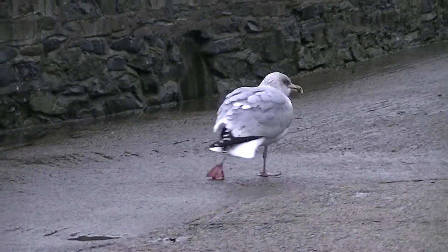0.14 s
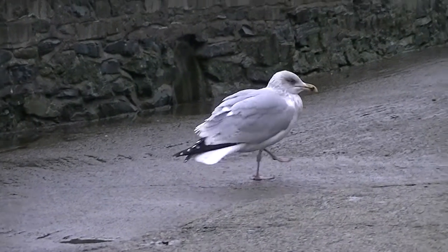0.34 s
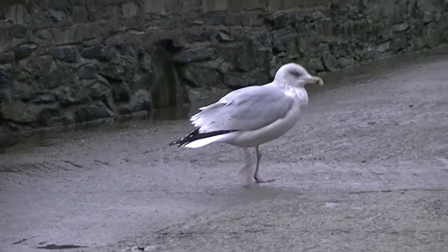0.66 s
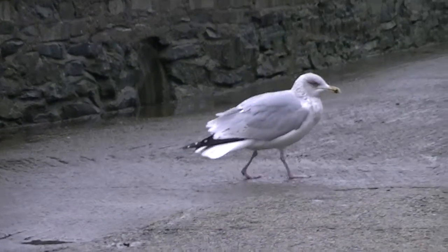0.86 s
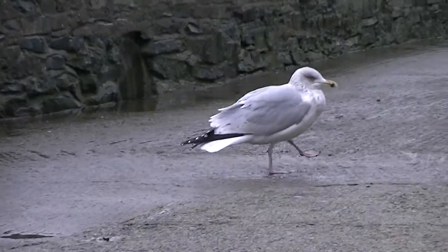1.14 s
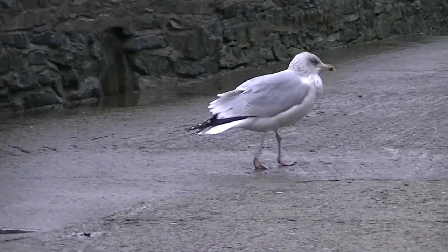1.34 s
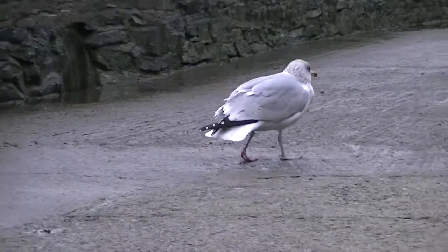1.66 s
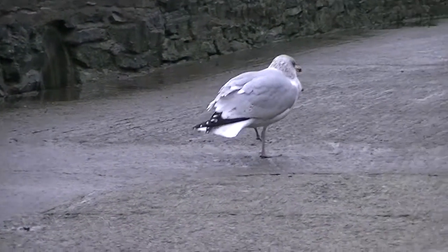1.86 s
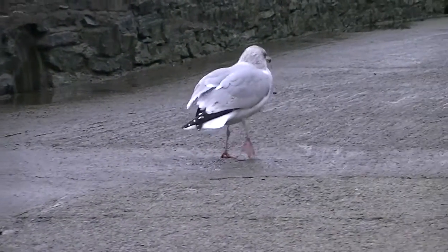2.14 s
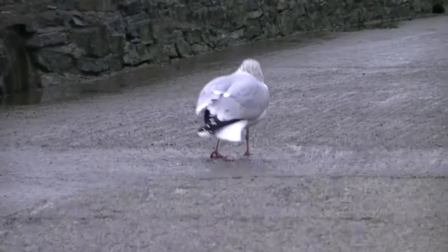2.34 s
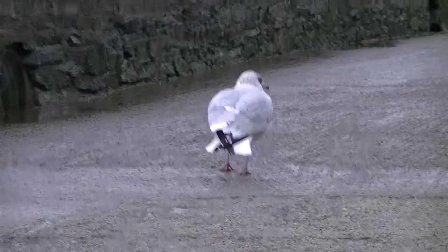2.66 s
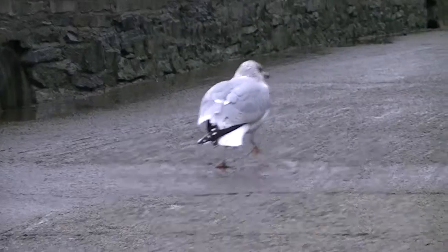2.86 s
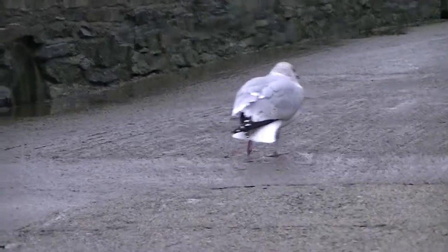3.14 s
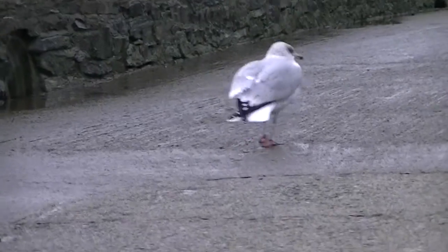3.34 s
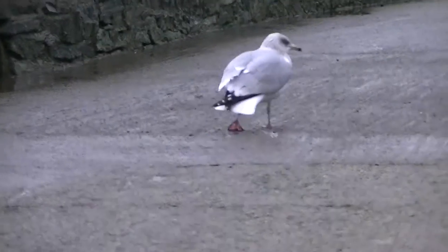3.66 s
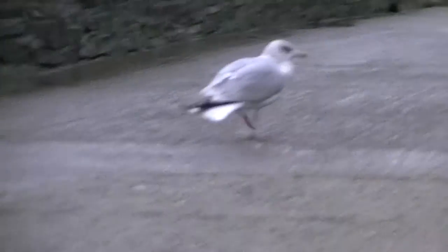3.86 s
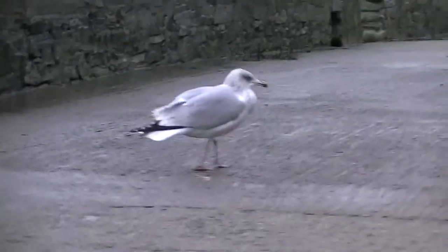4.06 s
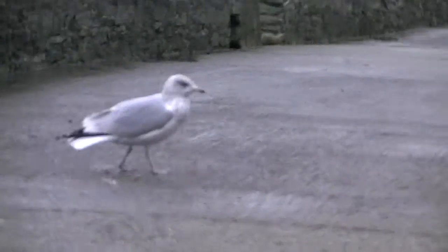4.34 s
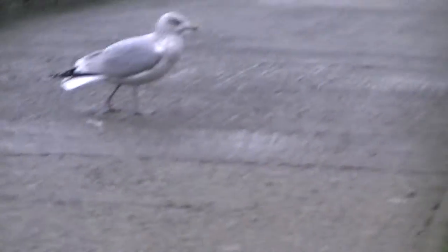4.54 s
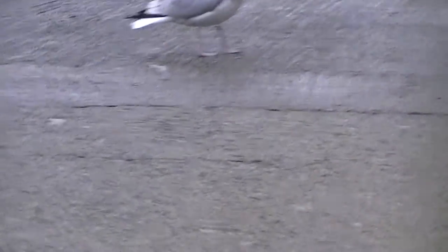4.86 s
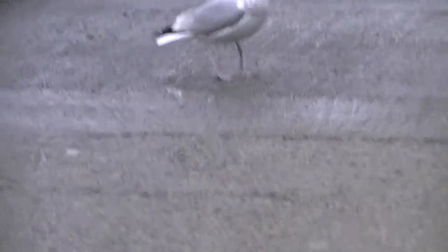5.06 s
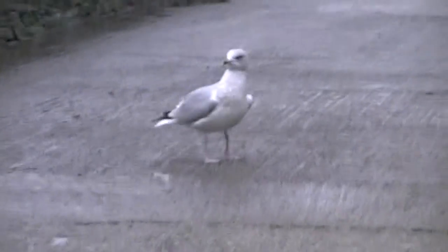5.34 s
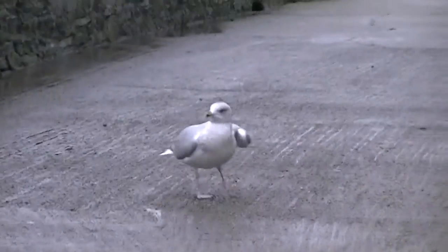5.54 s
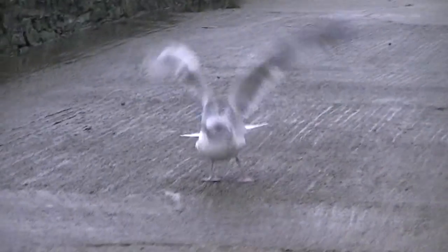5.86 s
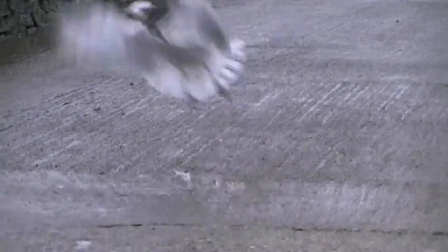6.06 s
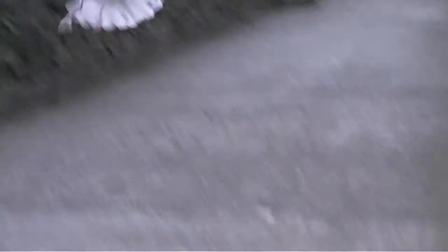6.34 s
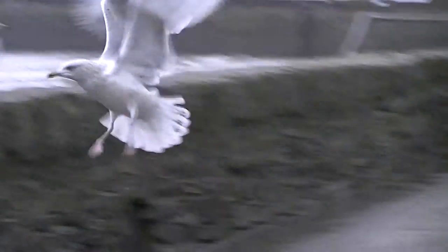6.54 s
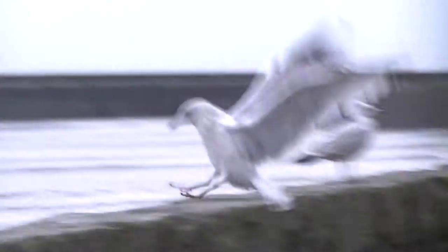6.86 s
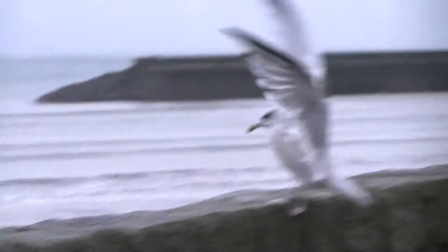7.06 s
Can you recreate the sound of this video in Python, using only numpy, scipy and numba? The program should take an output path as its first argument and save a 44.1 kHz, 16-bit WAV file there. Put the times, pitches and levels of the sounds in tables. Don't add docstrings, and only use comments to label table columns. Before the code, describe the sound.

A seaside slipway with continuous surf, a mid-heavy rushing hiss, slightly wide, with thin bass. From about 0.1 to 1.05 s a gull gives a long, rough, buzzing cry, moderate in level, its pitch rising and then falling; a crisp foot tick falls at 0.75. Surf alone follows until a short, much louder, sinking squawk at 2.45-2.95. Foam hiss grows from 3 s, with a barely audible peep at 3.55 and light ticks at 3.25 and 4.2. From 5.3 a breaker swells sharply into a throbbing roar with spattering spray, strongest near 5.8. A third hoarse cry, in two parts, sounds at 5.5-6.0, fading into it. Soft, dull wing beats puff between 6.05 and 6.65. A distant small bird peeps upward at 6.77 and faintly downward at 7.0, with a sharp tick at 6.97, as the wave eases but stays strong. Cries have a short stony slap.

```python
import sys
import numpy as np
from scipy import signal
from scipy.fft import rfft, irfft
from scipy.io import wavfile
from scipy.ndimage import uniform_filter1d
from numba import njit

SR = 44100
rng = np.random.default_rng(int(sys.argv[2]) if len(sys.argv) > 2 else 0)


def volts_from_decibels(level):
    exponent = np.asarray(level, float) / 20
    return 10 ** exponent


def dump_mix(stems):
    frames = np.atleast_2d(stems).T
    limited = np.clip(frames, -1, 1)
    pcm = np.round(limited * 32767).astype(np.int16)
    wavfile.write(sys.argv[1], SR, pcm)


N = 317520


@njit
def svf(x, hz, width):
    y, band, low = np.empty(len(x)), 0., 0.
    for i in range(len(x)):
        g, k = np.tan(np.pi * hz[i] / SR), width / hz[i]
        v = (band + g * (x[i] - low)) / (1 + g * (g + k))
        band = 2 * v - band
        low = low + 2 * g * v
        y[i] = k * v
    return y


def resonance(x, hz, width_hz):
    centre_hz = np.clip(hz, 20, .45 * SR) + np.zeros(len(x))
    each_hz = 1.9 * width_hz
    y = svf(svf(x, centre_hz, each_hz), centre_hz, each_hz)
    return y / np.std(y)


def sharp_resonance(x, hz, width_hz):
    return resonance(resonance(x, hz, width_hz), hz, width_hz)


def butter(x, order, hz, kind="low"):
    return signal.sosfilt(signal.butter(order, hz, kind, fs=SR, output="sos"), x)


def walk(rate_hz, size=N):
    k = max(int(SR / rate_hz), 1)
    held = np.repeat(rng.standard_normal(size // k + 1), k)
    return 1.41 * uniform_filter1d(uniform_filter1d(held, k), k)[:size]


def columns(table, t):
    s, *cols = np.transpose(table)
    return [np.interp(t, s, c) for c in cols]


def on_log(table, hz):
    f, v = np.transpose(table)
    return np.interp(np.log(hz), np.log(f), v)


def add(out, x, t, pan_db):
    i = int(t * SR)
    sides = volts_from_decibels(np.multiply.outer([.5, -.5], pan_db + np.zeros(len(x))))
    x = (x * sides)[:, :N - i]
    out[:, i:i + x.shape[1]] += x


def coloured(extra=((20, 0), (20000, 0))):
    # (frequency [Hz], level per Hz [dB])
    surf_colour = [(30, -37.5), (150, -26.5), (290, -9.5), (500, -3.5), (610, -1.5), (880, -4),
                   (1410, -2.5), (1900, -4.5), (3260, -13.5), (4500, -19.5), (6000, -25.5), (8000, -36.5),
                   (11000, -48.5), (20000, -72)]
    hz = np.arange(N // 2 + 1) * SR / N + 1
    level_db = on_log(surf_colour, hz) + on_log(extra, hz)
    return irfft(rfft(rng.standard_normal(N)) * volts_from_decibels(level_db), N)


def drops(roar_db):
    drops_per_s, drop_db, spread_db, drop_hz = 40, -19.5, 2.5, 5800
    chance = rng.random((int(drops_per_s * N / SR), 3))
    at = (chance[:, 0] * N).astype(int)
    size = volts_from_decibels(roar_db[at] + drop_db - spread_db * np.log(chance[:, 1]))
    out = np.zeros((2, N))
    out[:, at] = size * [chance[:, 2], 1 - chance[:, 2]]
    return 20 * butter(out, 2, [.8 * drop_hz, 1.25 * drop_hz], "band")


def surf():
    # (time [s], breaker [dB], foam [dB])
    swell = [(0, 1.5, 0), (1.1, 0, 4.5), (1.5, 0, -1), (2.3, 1.5, -1), (3.0, -0.5, 6.5), (3.6, 0.5, 9),
             (4.3, 0, 7), (4.8, 3.5, 9.5), (5.05, 5, 12), (5.3, 7.5, 13), (5.5, 15.5, 10),
             (5.8, 17.5, 20.5), (6.05, 16, 12), (6.5, 14.5, 14.5), (6.8, 14, 13.5), (7.05, 10.5, 15),
             (7.2, 10.5, 15)]
    # (calm level [dB], per breaker [dB/dB], per foam [dB/dB])
    layers = [(-42, 0.575, -0.07), (-35, 0.3378, 0.2428), (-51, -0.2981, 1.143), (-43, 1.0265, -0.11)]
    # (frequency [Hz], side minus mid [dB])
    width_spectrum = [(60, -12), (110, -37), (190, -21), (340, -27), (600, -23), (1060, -16), (1880, -17),
                      (3330, -15.5), (5910, -13.5), (10500, -10)]
    breaker_db, foam_db = columns(swell, np.arange(N) / SR)
    wash_db, hiss_db, spray_db, roar_db = (db + a * breaker_db + b * foam_db for db, a, b in layers)
    mid, side = coloured(), coloured(width_spectrum)
    pair = np.array([mid + side, mid - side])
    low = butter(pair, 2, 900)
    top = butter(pair, 2, 3200, "high")
    body = pair - low - top
    parts = ((low, wash_db), (body, hiss_db), (top, spray_db))
    sea = sum(x / np.std(x) * volts_from_decibels(db + 0.69 * walk(9)) for x, db in parts)
    roar_hz, drift = 908, 0.078
    roar = resonance(rng.standard_normal(N), roar_hz * (1 + drift * walk(3.13)), 164.0)
    roar = roar * volts_from_decibels(roar_db + 0.5 * walk(30))
    upper = resonance(rng.standard_normal(N), 1.634 * roar_hz, 150.0)
    upper = upper * volts_from_decibels(roar_db - 9.5 + 1.5 * walk(14))
    return sea + roar + upper + drops(roar_db)


def far_peeps():
    # (time [s], length [s], start pitch [Hz], end pitch [Hz], level [dB])
    peeps = [
        (3.54, .03, 3000, 3020, -40.5),
        (6.765, .055, 2260, 2380, -27),
        (6.985, .115, 2380, 1650, -36.5),
    ]
    out = np.zeros((2, N))
    for s, length_s, from_hz, to_hz, db in peeps:
        u = np.arange(0, 1, 1 / (length_s * SR))
        pitch_hz = from_hz + (to_hz - from_hz) * u + 40 * walk(100, size=len(u))
        tone = np.sin(2 * np.pi * np.cumsum(pitch_hz) / SR)
        level = volts_from_decibels(db + 3.0 + 2.1 * walk(90, size=len(u)))
        add(out, level * tone * np.sqrt(np.sin(np.pi * u)), s, 0)
    return out


def ticks_and_flaps():
    # (time [s], peak level [dB], centre [Hz], T60 [s])
    ticks = [
        (0.7454, -18, 4100, 0.006),
        (3.241, -33, 5130, 0.0076),
        (4.22, -28, 4150, 0.0074),
        (6.6837, -31, 4280, 0.0066),
        (6.946, -42, 5540, 0.006),
        (6.9685, -16, 4800, 0.0036),
        (7.0294, -34, 4310, 0.006),
        (7.1044, -26, 4160, 0.006),
    ]
    # (time [s], peak level [dB], centre [Hz], T60 [s])
    flaps = [
        (6.064, -12.5, 834, 0.015),
        (6.229, -17, 780, 0.035),
        (6.316, -12, 920, 0.031),
        (6.489, -14, 950, 0.032),
        (6.614, -15, 1060, 0.013),
        (6.649, -27, 767, 0.025),
    ]
    out = np.zeros((2, N))
    t = np.arange(2048) / SR
    for events, width in ((ticks, .55), (flaps, .4)):
        for s, db, hz, t60_s in events:
            push = (rng.standard_normal(len(t)) + 14 * (t == 0)) * np.exp(-np.log(1000) * t / t60_s)
            puff = sharp_resonance(push, hz, width * hz)
            add(out, volts_from_decibels(db) * puff / np.max(np.abs(puff)), s, 0)
    return out


def reed(hz, jitter):
    turns = np.cumsum(hz * (1 + jitter * walk(150, size=len(hz))) / SR)
    k = np.arange(1, 29)[:, None]
    spread = 2 * np.pi * rng.random((len(k), 1))
    harmonics = np.cos(2 * np.pi * k * turns + spread) * (k * hz < 10800)
    return np.sum(harmonics, axis=0) / np.sqrt(7500 / hz)


def steady(x):
    k = int(.035 * SR)
    return x / np.sqrt(uniform_filter1d(uniform_filter1d(x ** 2, k), k))


def cry(row, temper, effort, syrinx, clear_db, jitter, droop):
    # (centre at rest [Hz], width [Hz], level [dB], per gape [dB], share of throat motion)
    throat = [(2028, 254, -0.5, 6.5, 1), (2720, 310, -14, 7, 0.18), (3480, 350, -12, -1, 0.17)]
    beak = [(4300, 280, -11, 0, .1), (5000, 240, -9, 0, .4), (5600, 300, -12, 0, .2),
            (7050, 420, -12, 0, .4)]
    # (centre [share of focus], width [Hz], level [dB], throat drop [dB/octave])
    passes = [(.65, 457, -18.5, 59.5), (0.802, 505, -4, -17.5), (1.06, 860, -0.5, -1), (1.5, 1030, -11, -9),
              (2.0, 1520, -18, -16)]
    from_hz, to_hz, hold, bright_db, pan_db = row
    deep_db, choke, breath, focus_hz, chest_db = temper
    left_db, deep_start_db, deep_end_db = clear_db
    t = np.arange(effort[0][0], effort[-1][0], 1 / SR)
    n = len(t)
    effort_db, gape, throat_hz = columns(effort, t)
    high_hz, deep_hz, gullet_hz = columns(syrinx, t)
    focus_hz = focus_hz * (high_hz / high_hz.mean()) ** .5
    drop_octaves = droop * np.log2(throat_hz.max() / throat_hz)
    breath = breath * np.clip(1 - .4 * gape, 0, 2)

    def shimmer(level_db, rate_hz, spread_db=1.6):
        return volts_from_decibels(level_db + spread_db * walk(rate_hz, size=n))

    rasp_hz = from_hz + (to_hz - from_hz) * np.clip((np.arange(n) / n - hold) / (1 - hold), 0, 1)
    rasp = np.cumsum(rasp_hz * (1 + .018 * walk(80, size=n)) / SR) % 1
    gate = 1 - np.clip(choke, 0, 1) * np.exp(-(np.minimum(rasp, 1 - rasp) / .18) ** 2)
    turn = .5 + .5 * np.tanh(4.5 * np.sin(2 * np.pi * rasp))
    bend = 1 + 0.018 * (rasp - .5)
    high = turn * reed(high_hz * bend, jitter)
    deep = (1 - turn) * reed(deep_hz * bend, jitter)
    clean = steady(gate * (high + volts_from_decibels(np.linspace(deep_start_db, deep_end_db, n)) * deep))
    source = gate * (high + volts_from_decibels(deep_db) * deep + .75 * breath * rng.standard_normal(n))

    beak_db = effort_db + bright_db + 0.27 * (effort_db - effort_db.max())
    voice = volts_from_decibels(effort_db + chest_db) * steady(resonance(source, 1110, 230))
    gullet = steady(resonance(source, gullet_hz, 220))
    voice = voice - shimmer(effort_db - 0.85 - 6 * gape, 22.8) * gullet
    for share, width_hz, db, per_drop in passes:
        level = shimmer(beak_db + left_db + db + per_drop * drop_octaves, 9.1, spread_db=1.8)
        voice = voice + level * sharp_resonance(clean, share * focus_hz, width_hz)
    for k, (hz, width_hz, db, per_gape, share) in enumerate(throat + beak):
        centre_hz = hz * (throat_hz / 2000) ** share
        drive_db = effort_db
        if k >= len(throat):
            drive_db = beak_db - 4 * np.minimum(((centre_hz - focus_hz) / 900) ** 2, 2.2)
        level = shimmer(drive_db + db + per_gape * gape, 24.8)
        voice = voice + (-1) ** k * level * steady(resonance(source, centre_hz, width_hz))

    air = volts_from_decibels(beak_db - 20) * resonance(source, 2600.0, 1800.0)
    air = air + volts_from_decibels(beak_db - 32) * resonance(source, 12800.0, 2000.0)
    snap = resonance(gate * rng.standard_normal(n), 12500.0, 1300.0)
    air = air + volts_from_decibels(beak_db - 16.5) * np.exp(-(t - t[0]) / 0.039) * snap
    fade = np.clip(np.minimum(t - t[0], t[-1] - t) / 0.027, 0, 1)
    return (voice + air) * fade, pan_db


def gulls():
    # (rasp at start [Hz], rasp at end [Hz], rasp hold [0-1], beak over throat [dB], pan [dB])
    cries = [(91.3, 71, .12, -4, 2), (88.9, 57, .4, -0.5, 1.4), (92.2, 66, .1, -7, .6)]
    # (low side over high [dB], choke [0-1], breath share, beak focus [Hz], chest [dB])
    tempers = [(0, 0.7, 1.8, 4390, -6), (0, 0.67, 1.27, 4840, -21), (0, .6, 1.75, 4690, -15)]
    # (time [s], effort [dB], gape [0 = middling, negative = narrower], throat [Hz])
    efforts = [
        [(.1, -44, -.6, 1970), (.125, -33.5, -0.85, 2140), (.22, -33, -0.53, 2280), (.46, -34, -0.33, 1970),
         (.57, -33, 0.73, 1830), (.72, -34.5, 0.87, 1850), (.8, -40, -0.27, 1880), (.93, -39, -0.57, 2000),
         (1.06, -52, 0, 1950)],
        [(2.44, -46, 0.18, 2300), (2.462, -23.5, 0.89, 2100), (2.52, -20.5, -0.028, 2170),
         (2.62, -22.5, -0.25, 2200), (2.7, -22.5, .1, 2092), (2.82, -26, 0.52, 1870), (2.89, -34, -0.75, 1860),
         (2.92, -42.5, -2.2, 1880), (2.95, -56, -0.54, 1900)],
        [(5.475, -33, -.6, 1860), (5.505, -22.5, -.1, 1900), (5.59, -22, -0.35, 1980), (5.66, -22, 0.69, 1810),
         (5.72, -27, -0.7, 1890), (5.83, -30.5, 0.18, 1990), (5.92, -33, 0.16, 1850), (6.0, -42, -0.32, 1850)],
    ]
    # (time [s], high side pitch [Hz], low side pitch [Hz], gullet [Hz])
    pitches = [
        [(.1, 765, 599, 1560), (.25, 790, 627, 1530), (.5, 856, 619, 1450), (.58, 909, 614.6, 1580),
         (.7, 929, 615, 1570), (.8, 878, 569, 1493), (.95, 763, 528, 1500), (1.06, 762, 522, 1400)],
        [(2.43, 756, 517, 1420), (2.5, 767, 523, 1530), (2.56, 732, 522, 1610), (2.74, 678, 526.5, 1490),
         (2.84, 642, 546, 1372), (2.95, 600, 549, 1210)],
        [(5.47, 945, 658, 1390), (5.6, 948, 639.6, 1350), (5.66, 963, 637, 1400), (5.77, 970, 687, 1430),
         (5.82, 998, 682, 1480), (5.88, 966, 640, 1430), (6.0, 842, 630, 1430)],
    ]
    # (clean harmonics left [dB], low side over high at start [dB], at end [dB])
    clear = [(-2, 3, 9), (1, 8, -10), (-4, 4, 4)]
    jitters = [.01, .008, .02]
    droops = [0.78, 1.27, .8]
    out = np.zeros((2, N))
    for settings in zip(cries, tempers, efforts, pitches, clear, jitters, droops):
        voice, pan_db = cry(*settings)
        add(out, voice, settings[2][0][0], pan_db)
    lag = np.arange(int(.12 * SR))
    tail = rng.standard_normal((2, len(lag))) * np.exp(-lag / SR / 0.013)
    tail = tail / np.sqrt(np.sum(tail ** 2, 1))[:, None]
    slap = signal.fftconvolve(out.mean(0)[None], tail, axes=1)[:, :N]
    return out + volts_from_decibels(-13) * slap


def scene():
    return surf() + far_peeps() + ticks_and_flaps() + gulls()


def low_pass(x):
    return signal.sosfilt(signal.butter(12, 15700, fs=SR, output="sos"), x)


def record(dry):
    x = butter(dry, 4, 170, "high")
    x = butter(x, 4, 9500)
    limit_db, limit_share, limit_s = -22, 0.48, 0.068
    size = int(limit_s * SR)
    loud = uniform_filter1d(np.mean(x ** 2, 0), size, origin=size // 3) / volts_from_decibels(2 * limit_db)
    x = x * (1 + loud) ** (-limit_share / 2)
    noise = rng.standard_normal((3, N))
    rumble = butter(noise[0] + .5 * noise[1:], 1, [70, 160], "band")
    hiss = butter(noise[0] + .3 * noise[1:], 2, 11000)
    return low_pass(x + volts_from_decibels(-81) * rumble + volts_from_decibels(-71.5) * hiss)


dry = scene()
out = record(dry)
dump_mix(out)
```